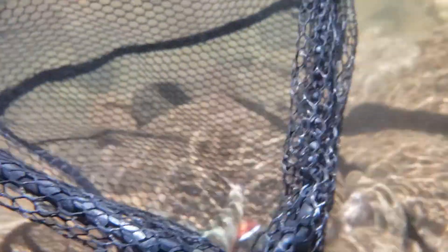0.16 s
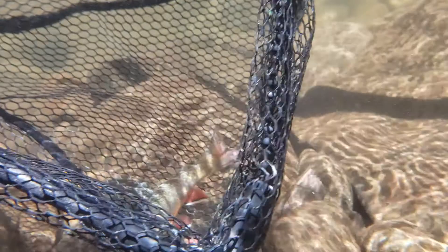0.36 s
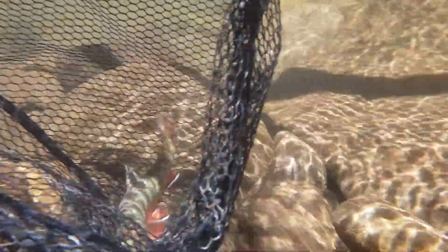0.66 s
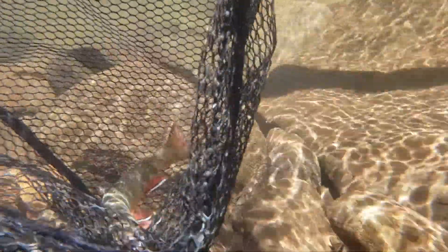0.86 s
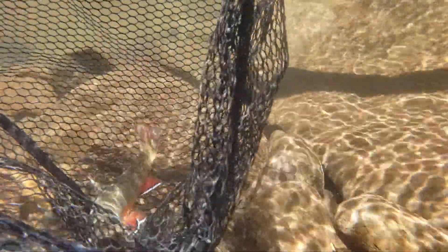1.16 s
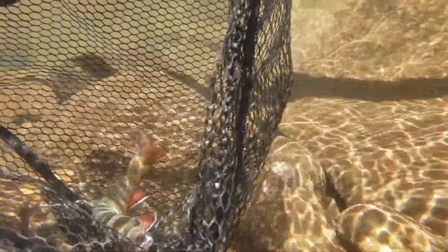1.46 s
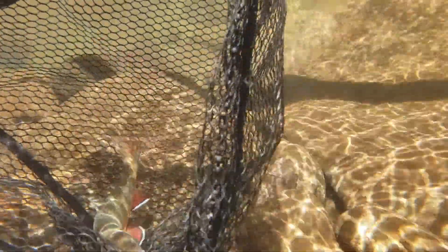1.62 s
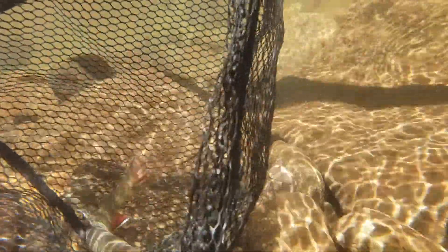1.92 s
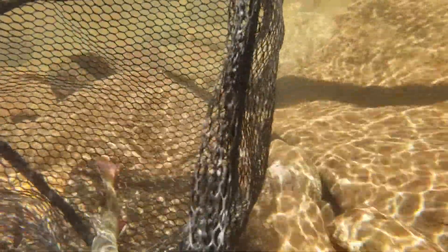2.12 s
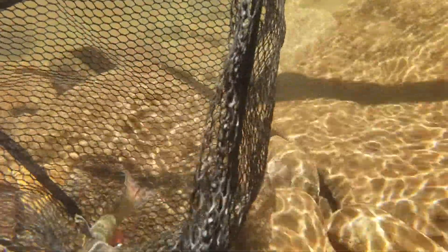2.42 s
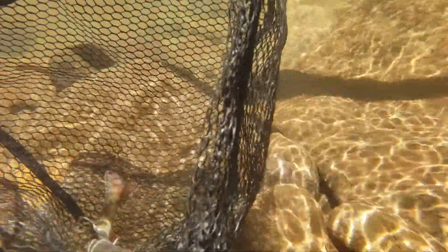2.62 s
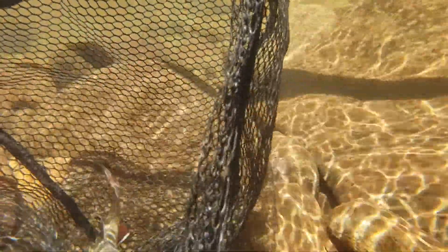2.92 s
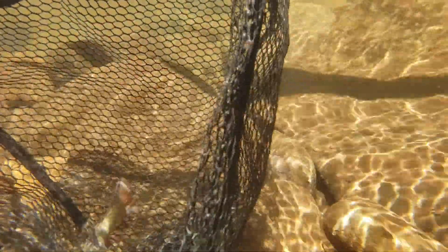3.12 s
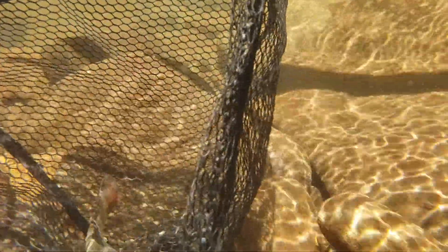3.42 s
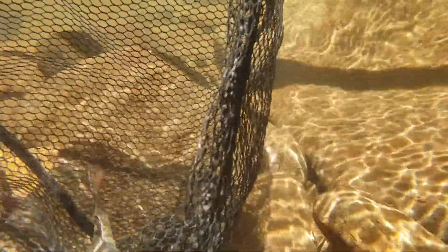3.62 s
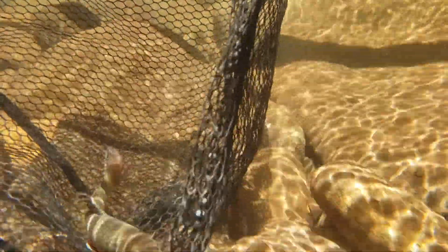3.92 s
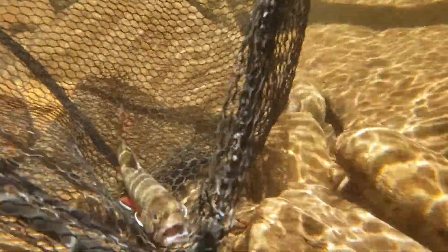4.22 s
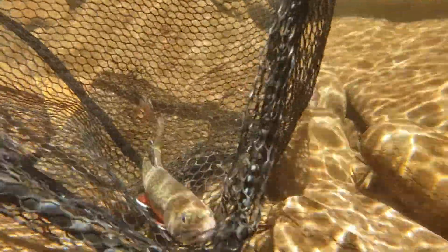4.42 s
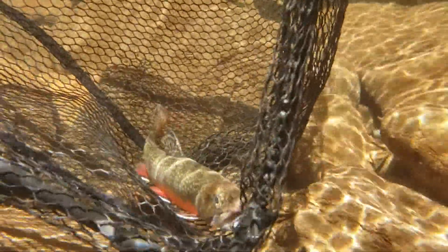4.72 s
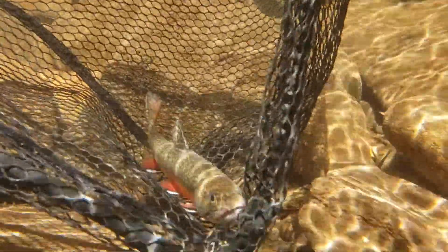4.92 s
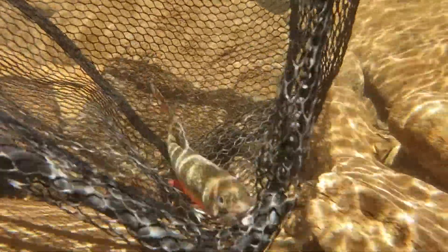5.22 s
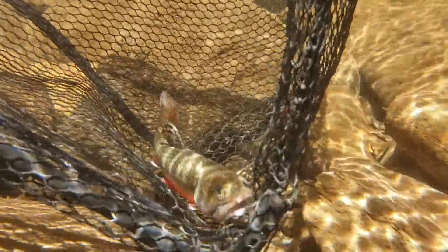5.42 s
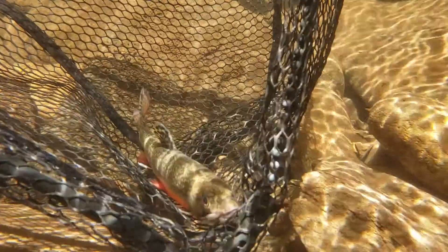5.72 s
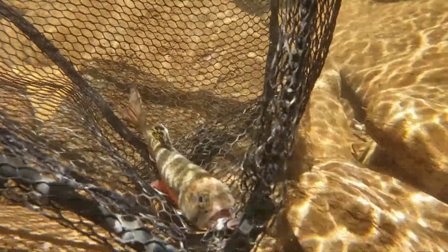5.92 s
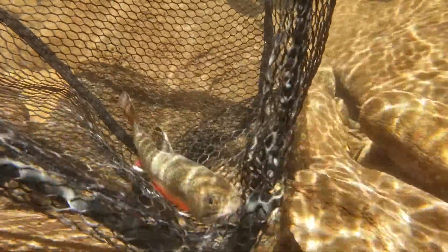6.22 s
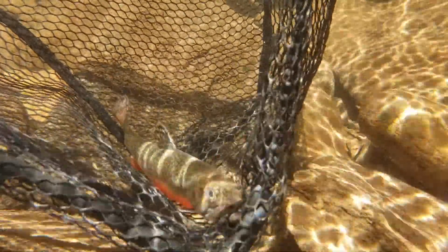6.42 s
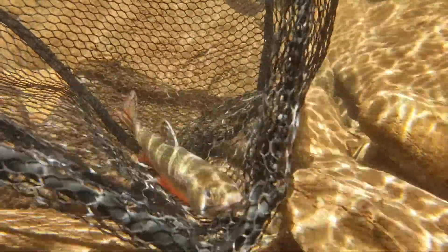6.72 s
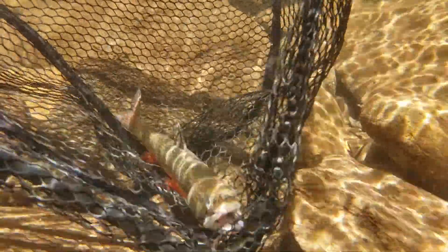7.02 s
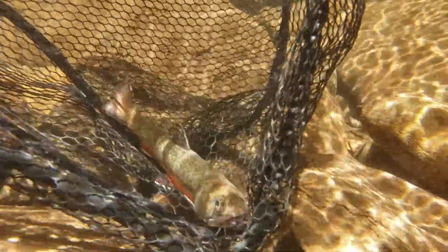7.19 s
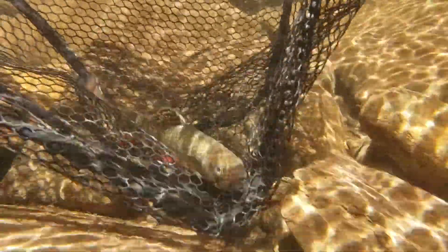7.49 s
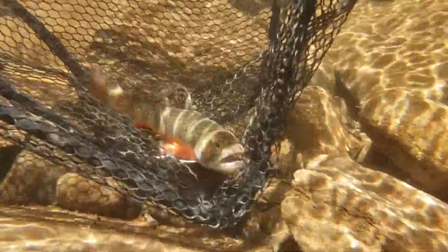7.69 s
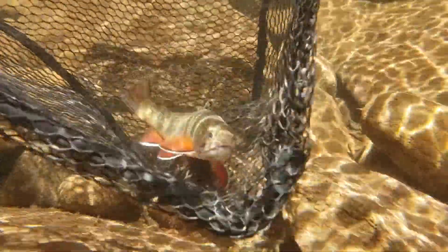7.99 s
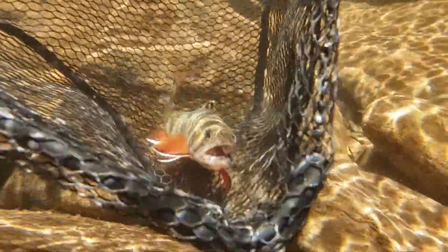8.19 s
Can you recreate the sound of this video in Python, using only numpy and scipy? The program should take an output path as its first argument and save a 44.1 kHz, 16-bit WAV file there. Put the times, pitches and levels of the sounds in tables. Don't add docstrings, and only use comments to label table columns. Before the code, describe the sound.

A shallow stream heard from below the surface: dull, hollow water flow, bubbles and gurgles, early heavy thuds, later light bumps against the housing.

```python
import sys
import numpy as np
from scipy import signal
from scipy.fft import rfft, irfft, next_fast_len
from scipy.io import wavfile
from scipy.ndimage import map_coordinates

SR = 44100
rng = np.random.default_rng(int(sys.argv[2]) if len(sys.argv) > 2 else 0)


def unload_audio(sound):
    columns = np.transpose(np.atleast_2d(sound))
    steps = np.round(np.clip(columns, -1, 1) * 32767)
    wavfile.write(sys.argv[1], SR, steps.astype(np.int16))


def invert_db(x):
    u = np.asarray(x, float) / 20
    return 10 ** u


N = 368235
T = np.arange(N) / SR
SIZE = next_fast_len(N)
HZ = np.maximum(np.arange(SIZE // 2 + 1) * SR / SIZE, 1)

# time_s, level_db
RUSH_LEVEL = [(0, -38), (.3, -33.5), (.8, -35), (2, -34), (2.6, -36), (3.2, -35), (3.6, -36), (4.1, -34),
              (4.8, -35), (5.25, -34), (5.6, -36), (6.1, -35), (6.9, -35), (7.3, -34), (8.35, -33.5)]
# pitch_hz, left_db_per_hz, right_db_per_hz
PORT_COLOUR = [(139, 4.5, -0.5), (197, 2, 7), (270, 2.5, -1), (332, 5, 3), (420, 8, 6), (507, 14, 10),
               (602.4, 6, 8), (686, -3.5, -3), (756, -3, -13), (995, -11.5, -18), (1410, -18.5, -40.5),
               (1793, -28, -47), (2300, -48.5, -50.5), (3000, -53.5, -58)]
# pitch_hz, likeness_0_to_1
PORT_LIKENESS = [(140, 1), (200, 0.99), (300, 0.5), (450, 0.9), (650, 0.08), (1000, 0.3), (2000, 0.1)]
# time_s, level_db, lean_to_left_db
EDDY_LEVEL = [(0, -29.5, -3.5), (.25, -26.5, 3), (.5, -34, -2.5), (1, -40, 0.5), (1.8, -45.5, 0),
              (2.25, -41.5, 0), (2.75, -45, 4), (3.5, -44, 1), (4.1, -37.5, 0.5), (4.6, -40, 1),
              (5.15, -36.5, 1), (5.6, -37.5, -6.5), (6.2, -41.5, -2), (6.9, -41.5, 4), (7.3, -43, -1.5),
              (8.35, -44, 0.5)]
# pitch_hz, level_db_per_hz
EDDY_COLOUR = [(12, -20.5), (25, -2), (35, -1), (50, 3), (70, 1.5), (100, -6), (140, -12.5), (220, -25.5)]
# start_s, end_s, lift_db
SINGING_SPELLS = [
    (0, 0.952, 9),
    (2.552, 4.05, 3),
    (4.249, 4.749, -3.5),
    (4.95, 6.153, 6.5),
]
# pitch_hz, level_db_per_hz
HISS_COLOUR = [(1500, 2.5), (3000, 3), (5000, 1), (8000, -10.5), (12500, 5.5), (16000, -0.4)]
KNOCKS = {(0, -1): [(.1883, -11.2, 137, 48, -9), (.3614, .9, 323, 66, -6.5)],
          (1, -1): [(.1882, -5.3, 460, 50, -1), (.3615, 4.8, 279, 59.5, -30)],
          (0, 1): [(6.8953, -12.5, 361, 55, -4)], (1, 1): [(3.5582, -15.9, 321, 61, -6),
          (4.3029, -13.5, 290, 58, 0)]}
# time_s, peak_db, pitch_hz, length_s, left_minus_right_db
TOUCHES = [
    (0.188, -48, 825, 0.0024, -20),
    (4.147, -34.5, 872, 0.015, 3),
    (4.304, -30, 827, 0.0028, -14),
    (4.646, -33, 870, 0.005, 20),
    (6.897, -29.5, 876, 0.006, 29),
    (6.896, -48, 1790, 0.0017, 25),
    (6.896, -64, 2900, .0012, 27.5),
    (7.233, -36, 953, 0.0096, 20),
    (7.539, -35.5, 820, 0.0068, 14),
]
# time_s, peak_db, pitch_hz, length_s
LEFT_BUBBLES = [(.255, -22, 440, 0.003), (.269, -16, 436, 0.0021), (.303, -29, 497, .0029),
                (.554, -23.5, 535, 0.021), (.824, -21.5, 556, 0.0067), (2.638, -27, 514, 0.01),
                (3.015, -25, 516, 0.0059), (3.313, -26, 472, .011), (3.975, -20.5, 540, 0.011),
                (4.118, -21, 500, 0.013), (4.61, -30.5, 543, .0047), (4.646, -21, 452, .0025),
                (4.684, -26.5, 507, 0.013), (5.373, -27, 415, 0.0078), (5.885, -22.5, 490, .0065),
                (5.988, -21.5, 482, 0.0094), (6.665, -24, 550, 0.0081), (6.868, -24, 430, 0.004),
                (7.046, -33, 547, 0.0034), (7.516, -23, 513, 0.0034), (7.527, -25.5, 510, .01),
                (7.547, -17.5, 545, .0025)]
RIGHT_BUBBLES = [(.239, -14, 564, 0.0044), (.935, -22.5, 467, 0.0052), (1.192, -12, 420, .0044),
                 (3.237, -24, 416, .0051), (3.991, -17, 406, 0.0072), (4.008, -26.5, 472, 0.024),
                 (4.031, -21, 418, .0054), (4.057, -24, 460, 0.0098), (4.08, -24.5, 560, 0.0071),
                 (4.092, -24, 394, .01), (4.123, -21.5, 422, 0.0047), (5.326, -22.5, 518, 0.0049),
                 (5.489, -24.5, 513, 0.016), (5.569, -19, 485, 0.0042), (6.106, -27, 525, .0048),
                 (7.987, -26.5, 547, 0.0045)]
# time_s, lift_db, pitch_hz, length_s,
# right_share_0_to_1
GURGLE_EVENTS = [(.275, 8, 620, 0.047, .3), (6.95, -3.5, 550, 0.08, .5), (6.4, 4, 240, .1, .5),
                 (7.53, 3.5, 600, .025, .5), (4.78, 6.5, 2000, .02, .2), (5.4, 7, 1400, .12, .95),
                 (5.62, 6, 1600, .05, 0.9), (5.5, 4.5, 200, .15, 0.7), (7.235, 11.5, 4000, .02, .15),
                 (7.15, 7, 200, .015, .3), (7.238, 17, 2350, .018, .15), (7.23, 9, 1100, 0.028, .2),
                 (7.22, 8, 240, 0.046, 0.5), (7.54, 6.5, 200, .04, .5), (6.6, 6.5, 750, 0.045, .4),
                 (7.56, 11.5, 2400, .045, .15), (7.95, 5, 690, 0.062, .2), (8.16, 6.5, 690, 0.065, .15),
                 (8.14, 7, 2300, .03, .15)]
# time_s, peak_db, pitch_hz, length_s
NET_BUMPS = [(.297, -13.5, 76, 0.0222), (.33, -21, 62.2, .025), (1.022, -24.5, 71, .017),
             (1.237, -20, 49, .025), (1.308, -13.5, 56, 0.036), (1.371, 5.5, 58, 0.021),
             (1.648, -27.5, 53, .044), (2.234, -8.5, 72, .017), (2.579, -8, 56.8, .027),
             (2.667, -25.5, 75.5, .014), (2.687, -7, 67, 0.017), (2.722, -17.5, 55, 0.011)]
# time_s, pitch_hz
TINY_BUBBLES = [(.423, 1722), (1.457, 1360), (1.475, 1679), (1.79, 1593), (1.923, 1210), (2.173, 1010),
                (2.565, 1722), (3.224, 1700), (3.273, 1520), (3.975, 1800), (4.152, 1636), (4.344, 1600),
                (4.523, 1400), (4.648, 966), (4.765, 1140), (4.795, 1593), (5.141, 2260), (5.167, 1230),
                (5.646, 1636), (5.646, 1320), (6.134, 2740), (6.441, 993), (6.899, 970), (7.22, 1180),
                (7.234, 2420), (7.45, 1722), (7.577, 2153), (7.895, 1170), (7.976, 1630), (8.142, 2210)]
# time_s, peak_db, left_minus_right_db
EDDY_SLAPS = [(1.123, -28.5, -6), (2.383, -28.5, -18), (3.592, -21, -25.5), (3.908, -35, -12),
              (4.078, -29, -7.5), (4.391, -27, -15), (4.663, -26.5, -4.5), (5.382, -24, -2.5),
              (5.607, -29, 9), (5.976, -29, 3.5), (6.106, -28, -12.5), (6.433, -29.5, -18),
              (7.149, -27.5, 16), (7.188, -28, -20), (7.21, -27.5, 9), (7.382, -26, -10), (7.528, -30, 3.5),
              (8.305, -32, -2)]
# time_s, gain_db
RECORDER_GAIN = [
    (0, -10.5),
    (.3, -8.5),
    (3.5, -6),
    (4.0, -3),
    (4.6, -2.5),
    (5.5, 0.0),
    (8.35, 0.04),
]


def rms_one(x):
    return x / np.sqrt(np.mean(x ** 2, axis=-1, keepdims=True) + 1e-20)


def in_time(rows):
    times, *columns = np.transpose(rows)
    return [np.interp(T, times, column) for column in columns]


def at_hz(points, hz, axis=1):
    table = np.array(points)
    return np.interp(np.log(hz), np.log(table[:, 0]), table[:, axis])


def drift(rate):
    knots = rng.standard_normal(2000)
    coarse = map_coordinates(knots, [10 + T[::32] * rate * 2], order=3)
    return np.interp(T, T[::32], rms_one(coarse))


def white():
    return rfft(rng.standard_normal((2, SIZE)))


def placed(rows, pan_db):
    return [(*row, pan_db) for row in rows]


def pulses(rows, tail, fall, turn):
    out = np.zeros((2, N))
    for s, peak_db, hz, length, pan_db in rows:
        near = slice(max(round((s - .08) * SR), 0), round((s + .12) * SR))
        u = (T[near] - s) / length
        shape = np.exp(-2.8 * (u / tail ** np.tanh(u)) ** 2)
        slide = 1 - fall * 2 * np.tanh(u / 2)
        wave = shape * np.sin(2 * np.pi * (hz * length * u * slide + turn))
        left_db = peak_db + min(pan_db, 0)
        right_db = peak_db - max(pan_db, 0)
        out[:, near] += wave * invert_db([[left_db], [right_db]])
    return out


def rush(patchy_db, shared, slow_db, fleck_db):
    mid, side = white()
    alike = np.clip(at_hz(PORT_LIKENESS, HZ), 0, .98)
    both = np.sqrt(1 + alike) * mid + np.sqrt(1 - alike) * side * [[1], [-1]]
    late_s = np.array([[0], [.00015]])
    edge = (HZ > 100) * (HZ < 3600) * np.exp(-2j * np.pi * HZ * late_s)
    both = both * invert_db([at_hz(PORT_COLOUR, HZ, axis=1), at_hz(PORT_COLOUR, HZ, axis=2)]) * edge
    out = np.zeros((2, N))
    together = drift(22)
    for step in range(16):
        place = np.clip(3 * np.log2(HZ / 120) - step, -1, 1)
        centre_hz = 120 * 2 ** (step / 3)
        band = irfft(both * np.cos(place * np.pi / 2) ** 2, SIZE)[:, :N]
        burst = shared * together + drift(16)
        swell_db = patchy_db * (burst + 0.19 * burst ** 2) + slow_db * drift(4.4)
        flecks = np.maximum(drift(30) - 1.1, 0) * (centre_hz > 650)
        out += invert_db(swell_db + fleck_db * flecks + gurgle_db(centre_hz)) * band
    return rms_one(out)


def eddies(lumpy_db):
    noise = irfft(white() * invert_db(at_hz(EDDY_COLOUR, HZ)) * (HZ < 300), SIZE)[:, :N]
    return rms_one(noise * invert_db(lumpy_db * np.array([drift(9.7), drift(9)])))


def singing_db():
    base_db, edge_s, waver_db = -54, .06, 1.5
    spells = 0
    for start, end, lift_db in SINGING_SPELLS:
        spells = spells + lift_db * (np.tanh((T - start) / edge_s) - np.tanh((T - end) / edge_s)) / 2
    return base_db + spells + waver_db * drift(3)


def housing(wander_hz, steady_from_db):
    note_hz, width_hz = 872, 23
    level_db = singing_db()
    mode = 1 / (1 + (2 * (HZ - note_hz) / width_hz) ** 2)
    ragged = rms_one(irfft(white()[0] * mode, SIZE)[:N])
    pitch_hz = note_hz + 3 + wander_hz * drift(6)
    steady = np.sqrt(2) * np.sin(2 * np.pi * np.cumsum(pitch_hz) / SR)
    share = np.clip((level_db - steady_from_db) / 6, 0, .8)
    note = np.sqrt(share) * steady + np.sqrt(1 - share) * ragged
    return note * invert_db(level_db) * [[invert_db(3.5)], [-invert_db(-0.5)]]


def hiss():
    band = (HZ > 1200) * (HZ < 14550)
    noise = irfft(white() * invert_db(at_hz(HISS_COLOUR, HZ)) * band, SIZE)[:, :N]
    return rms_one(noise) * invert_db([[-81], [-83]])


def knocks():
    t60_s = .105
    overload_t60_s = .142, 1.13
    glide_s, port_hz, guard_s = .002, 520, .38095
    out = np.zeros((2, N))
    water_load = signal.butter(2, 1000, fs=SR, output="sos")
    for (port, way), rows in KNOCKS.items():
        for s, peak_db, first_hz, last_hz, ring_db in rows:
            t60 = overload_t60_s[port] if peak_db > 0 else t60_s
            near = slice(round(s * SR), round((s + .2) * SR))
            u = np.maximum(T[near] - s, 0)
            turns = last_hz * u + (first_hz - last_hz) * glide_s * (1 - np.exp(-u / glide_s))
            onset = 1 - np.exp(-(u / .0009) ** 3)
            swing = np.sin(2 * np.pi * turns) * invert_db(-60 * u / t60)
            ring = np.sin(2 * np.pi * port_hz * u) * invert_db(ring_db - 60 * u / .035)
            muted = .1 * invert_db(-60 * (T[near] - guard_s) / .03)
            guard = np.where((T[near] < guard_s) | (s > guard_s), 1, muted)
            soft = signal.sosfilt(water_load, onset * (swing + ring))
            out[port, near] += way * invert_db(peak_db) * soft * guard
    return out


def touches():
    return pulses(TOUCHES, tail=2.2, fall=0.028, turn=.7)


def near_bubbles():
    rows = placed(LEFT_BUBBLES, 5.5) + placed(RIGHT_BUBBLES, -15.5)
    return pulses(rows, tail=1.0, fall=0.013, turn=0.68)


def gurgle_db(hz):
    spread_octaves = 0.49
    lift = np.zeros((2, N))
    for s, lift_db, centre_hz, length, right in GURGLE_EVENTS:
        near = slice(max(round((s - .3) * SR), 0), round((s + .3) * SR))
        off_pitch = np.log2(hz / centre_hz) / spread_octaves
        off_time = (T[near] - s) / length
        bump = lift_db * np.exp(-off_pitch ** 2 - off_time ** 2)
        lift[:, near] += bump * np.minimum([[2 - 2 * right], [2 * right]], 1)
    return lift


def thumps():
    slap_hz, slap_s = 76, 0.013
    slaps = [(s, db, slap_hz, slap_s, pan_db) for s, db, pan_db in EDDY_SLAPS]
    return pulses(placed(NET_BUMPS, 34) + slaps, tail=1.6, fall=0.092, turn=0.06)


def plinks(cycles, pan_db):
    peak_db, port_share = -35, 0.74
    low_hz, high_hz, stray_db = 900, 2100, -3
    when, pitch = rng.random((40, 2)).T
    strays = zip(when * T[-1], low_hz * (high_hz / low_hz) ** pitch, np.full(len(when), stray_db))
    rows = []
    for s, hz, db in [*placed(TINY_BUBBLES, 0), *strays]:
        level_db = peak_db + db + port_share * at_hz(PORT_COLOUR, hz)
        rows.append((s, level_db, hz, cycles / hz, pan_db))
    return pulses(rows, tail=1.2, fall=-0.006, turn=0)


def scene():
    eddy_db, lean_db = in_time(EDDY_LEVEL)
    right_db = -2.4 - 0.14 * lean_db
    rush_db = in_time(RUSH_LEVEL)[0] + [0 * T, right_db]
    water = invert_db(rush_db) * rush(patchy_db=1.0, shared=.7, slow_db=0.89, fleck_db=4.5)
    water = water + invert_db([eddy_db + lean_db / 2, eddy_db - lean_db / 2]) * eddies(lumpy_db=1.5)
    steady = housing(wander_hz=4, steady_from_db=-52.0) + hiss()
    hits = knocks() + touches() + thumps()
    bubbles = near_bubbles() + plinks(cycles=11, pan_db=22)
    return water + steady + hits + bubbles


def band_limit(x):
    return signal.sosfilt(signal.butter(12, 16840, fs=SR, output="sos"), x)


def record(dry):
    ending = np.clip((T[-1] - T) / .004, .3, 1)
    loud = dry * invert_db(in_time(RECORDER_GAIN)[0]) * ending
    treble_cut = signal.cheby2(12, 60, 16840, fs=SR, output="sos")
    mix = signal.sosfilt(treble_cut, loud)
    return band_limit(mix)


dry = scene()
out = record(dry)
unload_audio(out)
```